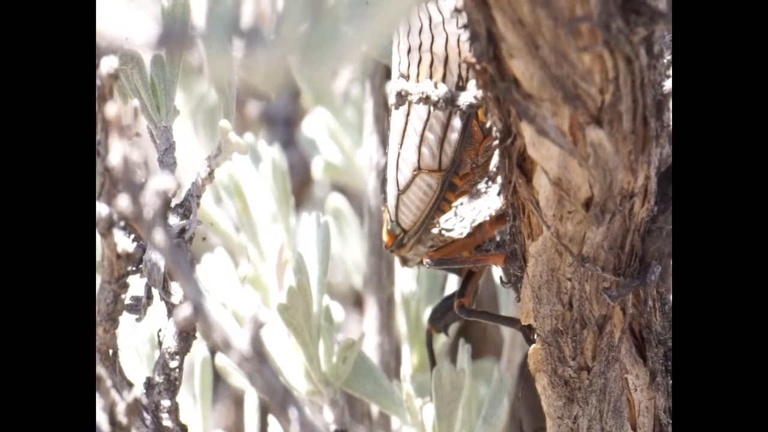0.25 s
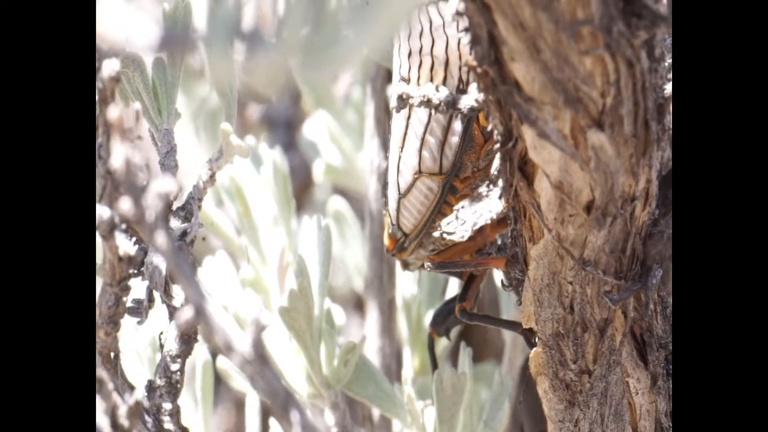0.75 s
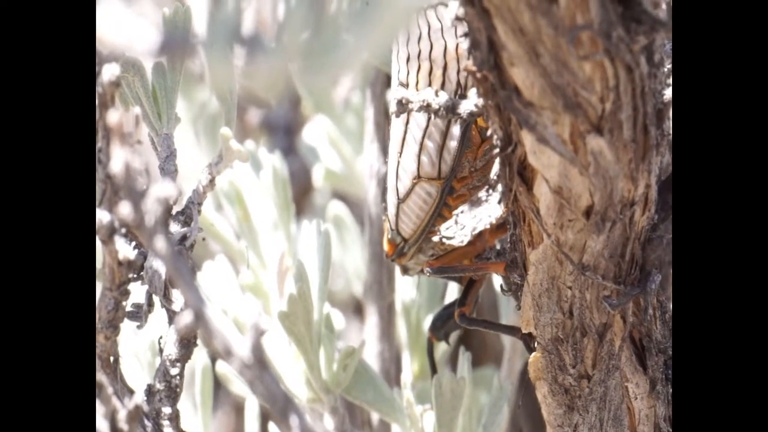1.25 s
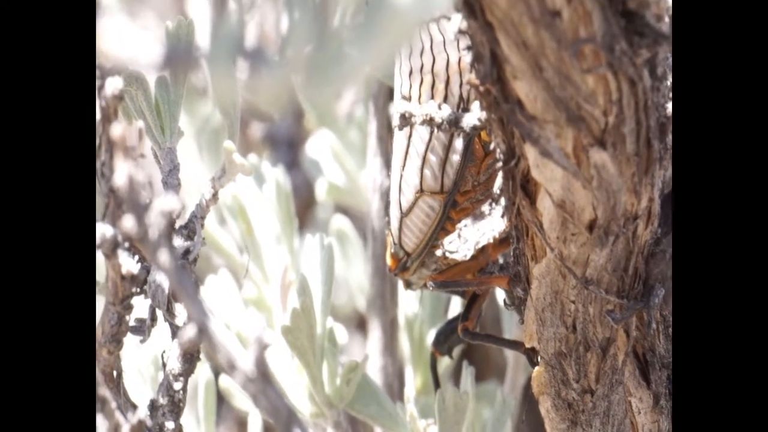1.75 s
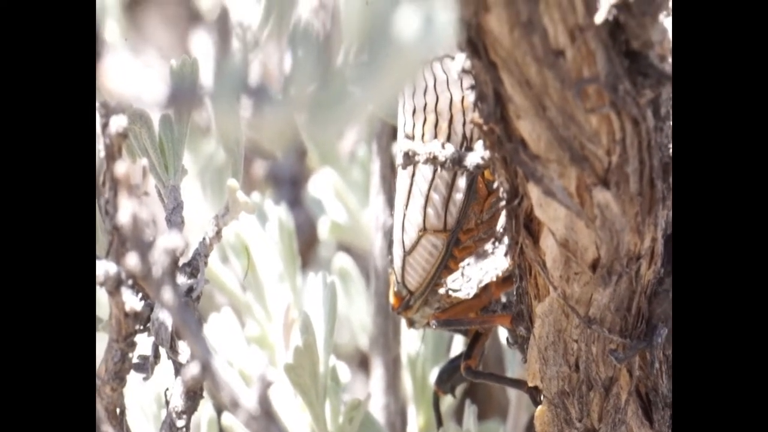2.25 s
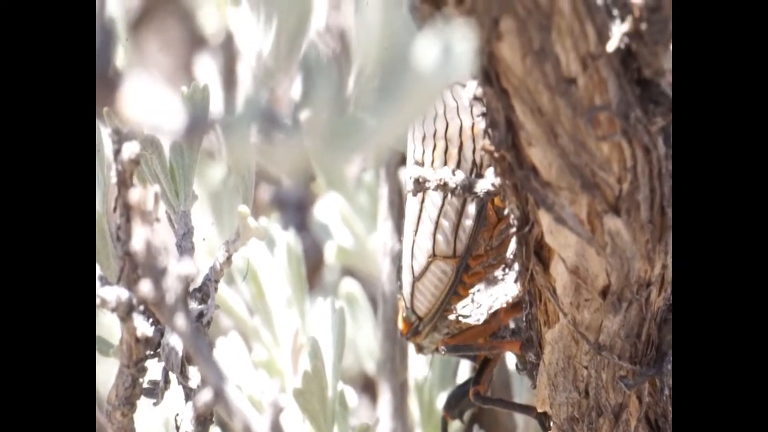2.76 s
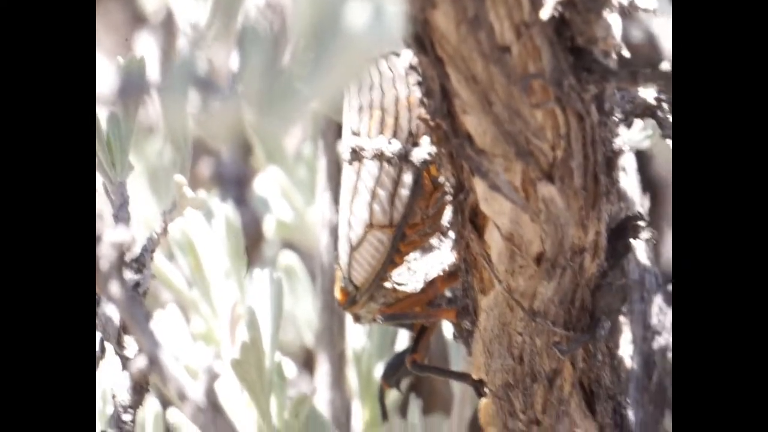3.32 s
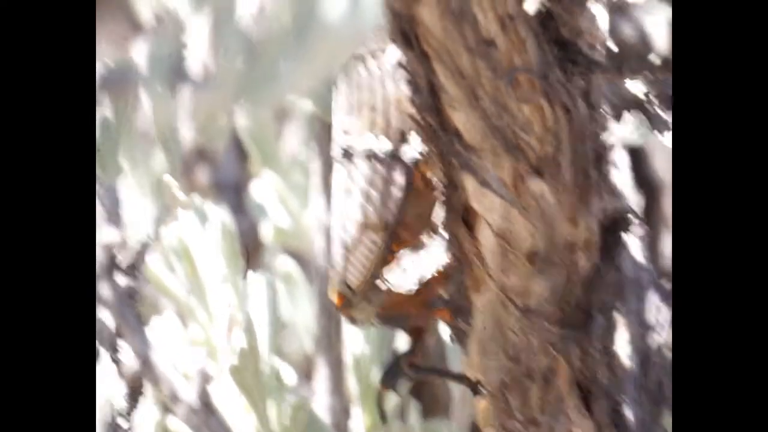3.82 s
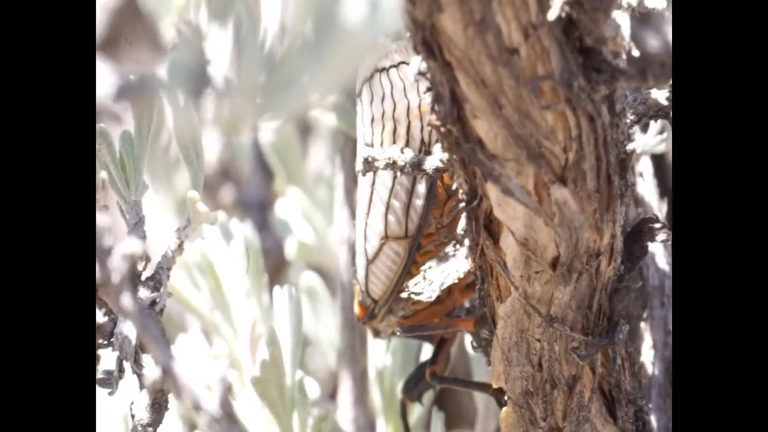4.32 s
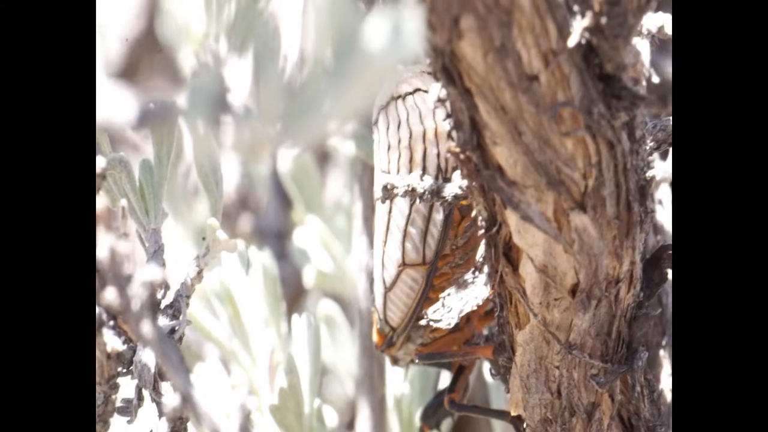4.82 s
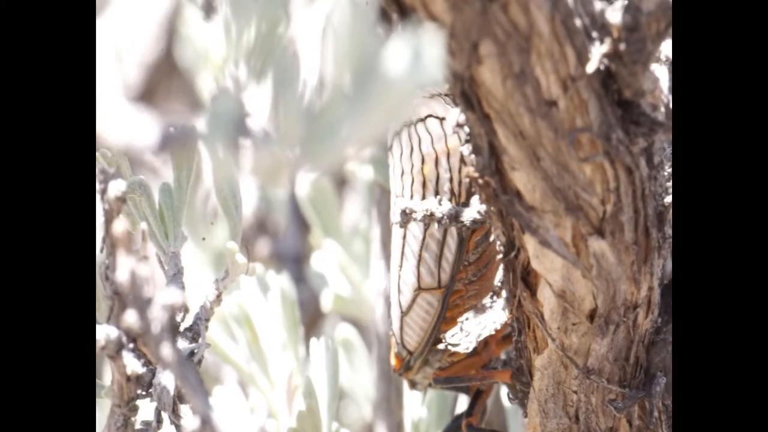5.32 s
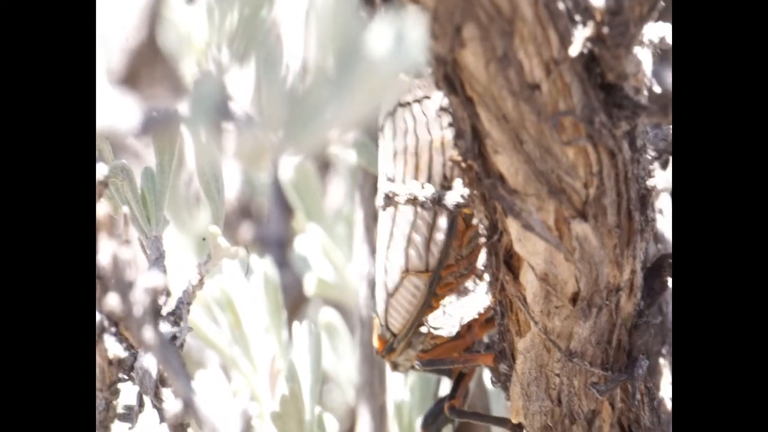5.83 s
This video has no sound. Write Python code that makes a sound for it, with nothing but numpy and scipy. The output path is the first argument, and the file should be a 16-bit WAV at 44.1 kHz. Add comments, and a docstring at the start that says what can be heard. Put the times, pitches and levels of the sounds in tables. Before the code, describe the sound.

A close cicada on a shrub trunk makes five accelerating dry ticks, then a high, rapidly pulsed buzz that builds, holds steady, grows louder near the end and stops abruptly. Low wind gusts thump a nearby stereo microphone, strongest in the middle. Distant cicadas throb faintly and the scrub hisses softly throughout.

```python
"""Far cicadas throb and scrub hisses faintly throughout, around a cicada on a shrub trunk close to a stereo microphone.
It gives a few single ticks, then a buzz that swells and stops; in between, gusts of wind buffet the microphone.
Each muscle stroke buckles the ribs of both tymbals one after another, then lets them snap back; the clicks ring the body.
Chorus, wind and scrub are coloured noise under slow or rhythmic envelopes; bark and leaves echo the near cicada."""
import sys
import numpy as np
from scipy import signal
from scipy.fft import rfft, irfft, next_fast_len
from scipy.io import wavfile
from scipy.ndimage import uniform_filter1d

SR = 44100
rng = np.random.default_rng(int(sys.argv[2]) if len(sys.argv) > 2 else 0)


def pcm_store(signal):
    """Save signal as 16-bit PCM."""
    levels = np.round(np.clip(np.atleast_2d(signal), -1, 1) * 32767)
    wavfile.write(sys.argv[1], SR, levels.astype(np.int16).T)


N = 267907
FAST = next_fast_len(N + 4096)  # transform length, with room for tails

# Pace of the tymbal muscle through the buzz. Each row: time in seconds, strokes per second.
STROKE_PACE = [(0.9416, 56.61), (1.07, 58.58), (1.33, 55.68), (1.55, 57.73), (1.95, 56.36), (2.2, 56.96),
               (3.45, 56.42), (3.7, 56.64), (4.2, 56.73), (4.75, 57.49), (5.25, 57.29), (5.56, 56.62),
               (5.62, 52.5)]
# Effort of the muscle. Each row: time in seconds, ribs buckled per stroke.
MUSCLE_EFFORT = [(1.07, 2.2), (1.08, 3.2), (1.7, 3.2), (1.71, 3.6), (2.02, 3.6), (2.05, 4.2), (4.5, 4.2),
                 (4.8, 4.5), (5.1, 5.5), (5.63, 5.8)]
# Background level while the buzz is loudest. Each row: time in seconds, level change in dB.
BACKGROUND_LEVEL = [(4.82, 0), (5.36, -12.5), (5.65, -12), (5.8, -6)]


def cicada():
    """Impulsive excitation of a resonator: ticks and buzz, with discrete bark echoes and decaying leaf scatter."""
    # Loudness of the buzz. Each row: time in seconds, level in dB, left minus right in dB.
    song = [(0.93, -41, 0), (1.06, -37.5, -2), (1.09, -32, 3), (1.15, -29, -1), (2.2, -25.5, -0.5),
            (4.7, -25.3, -1), (5.07, -20.5, -2), (5.6, -21, -3), (5.63, -24, -3)]
    level_db, pan_db = curve(song)
    buzz = steady(ring(*strokes())) * undb(level_db + np.array([pan_db, -pan_db]) / 2)
    near = tint(buzz + ticks(), rfft(surroundings(), FAST))
    return near + rasp(buzz, level_db)


def strokes():
    """Sequential buckling: times, levels, kinds, lift and pan of all clicks of the buzz."""
    # Ribs 2 to 6. Each row: level in dB, level when the abdomen is lifted in dB,
    # lead of the far tymbal in ms, far tymbal level in dB, timing scatter in ms.
    ribs_2_to_6 = [(-4, -2, .5, -1, .06), (0, 0, .6, -6, .15), (0, -1, .3, -8, .15), (-4, -2, .6, -3, .3),
                   (-6, -4, .5, -4, .35)]
    # Delays of ribs 4, 5 and 6 after the first, in ms.
    late_ribs_ms = (8.2, 10.2, 11.4)
    first_rib_db, weak_boost_db, snap_db = -9, 8, -9
    tymbal_pan_db = 2.5  # the two tymbals face different ways

    now = np.arange(N) / SR
    start_s, end_s = STROKE_PACE[0][0], STROKE_PACE[-1][0]
    done = np.cumsum(curve(STROKE_PACE)[0] * (now > start_s)) / SR
    k = np.arange(int(np.interp(end_s, now, done)) + 1)
    chance = rng.standard_normal((len(k), 3, 7))
    t0 = np.maximum(np.interp(k, done, now), start_s)
    t0 = t0 + .0002 * chance[:, 2, 0]  # 0.2 ms of jitter
    effort = curve(MUSCLE_EFFORT, t0)[0]
    lift = lifted(effort)
    second_ms = np.where(effort < 3, 2.55, 3.25)
    third_ms = 5.85 + .65 * lift
    snap_ms = 7.9 + 1.1 * effort  # more ribs, later snap-back
    # in a weak stroke the first rib stands closer to the second in level
    first_db = first_rib_db + weak_boost_db * (effort < 2.5) - 3 * lift
    # between two counts the last rib tends to buckle on every other stroke
    alternate = .5 * (1 - k % 2)
    ribs = np.floor(effort + alternate + .06 + .08 * chance[:, 2, 1])
    weak = ribs < 3

    # the first rib: a click and a fainter one 0.4 ms ahead
    clicks = [(t0, first_db, 1, lift, 0), (t0 - .0004, first_db - 7, 1, lift, 0)]
    for r, ms in enumerate((second_ms, third_ms) + late_ribs_ms):
        db, lifted_db, lead_ms, far_db, scatter_ms = ribs_2_to_6[r]
        on = ribs > r + 1
        # on the last early rib of a short stroke the far tymbal is fainter
        far_rib_db = far_db - 5 * (ribs == r + 2) * (r < 2)
        for side in (0, 1):  # near tymbal, far tymbal
            lead = side * lead_ms * (1 + lift)  # doubles once the abdomen is up
            t = t0 + (ms - lead + scatter_ms * chance[:, side, r]) / 1000
            size_db = db + lift * (lifted_db - db) + side * far_rib_db
            size_db = size_db + chance[:, 1 - side, r + 1]  # 1 dB of scatter
            kind = weak[on] * 1  # a weak stroke's second rib is as dull as the first
            clicks.append((t[on], size_db[on], kind, lift[on], tymbal_pan_db * (1 - 2 * side)))
    for side in (0, 1):
        t = t0 + (snap_ms - side * .5 + .2 * chance[:, side, 6]) / 1000
        size_db = snap_db - side * 3 + weak_boost_db / 2 * weak
        clicks.append((t, size_db, 2, lift, tymbal_pan_db * (1 - 2 * side)))
    return [np.concatenate([np.broadcast_to(c[i], c[0].shape) for c in clicks]) for i in range(5)]


def lifted(ribs):
    """Posture follows effort: how far the abdomen is raised, from 0 to 1."""
    # Effort, in ribs per stroke, at which the lift starts and ends.
    lift_ribs = (4.3, 5.5)
    return np.interp(ribs, lift_ribs, (0, 1))


def ring(s, db, kind, lift, pan_db):
    """Convolution with an impulse response: every click (0 rib, 1 first rib, 2 snap-back) rings the body."""
    # Ring of tymbals and air sac, abdomen down, then lifted. Each row: frequency in Hz, level in dB per Hz.
    body_down = [(1800, -62), (2400, -49), (3000, -35), (4000, -37), (4850, -36), (5150, -24), (5900, -19),
                 (6900, -23), (7250, -17), (7600, -5), (8000, -6), (8450, 0), (9100, -12), (10300, -8),
                 (11000, -14)]
    body_up = [(2500, -76), (4300, -54.5), (4900, -44), (5600, -26.5), (6500, -22), (7000, -20.5),
               (7450, -3), (8000, -11.5), (8500, -7), (9000, -6.5), (9600, -13), (10100, -15.5),
               (11000, -24)]
    # The first rib is duller, the snap-back brighter. Each row: frequency in Hz, gain in dB.
    first_rib = [(3000, -14), (5000, -10), (6500, -2), (7600, 2), (8600, -2), (9500, -14)]
    snap_back = [(4000, -18), (8600, -18), (9400, -4), (10200, 0)]
    # Level between the microphones. Each row: frequency in Hz, left minus right in dB.
    balance_db = [(3000, -6), (4800, -3.5), (5700, -1.5), (6300, -5.5), (7000, -5), (7700, 1), (8300, -1),
                  (9700, 0), (10100, -4)]
    # Phase between the microphones. Each row: frequency in Hz, lead of the left in radians.
    left_lead = [(4300, -0.33), (5500, -1.1), (6000, -0.88), (7000, -1.2), (7400, 1), (9000, -1.05),
                 (9300, 1), (9900, -0.7), (11000, -0.91)]

    # windowed sinc pulses place the clicks between samples
    taps = np.floor(s * SR).astype(int)[:, None] + np.arange(-7, 9)
    off = taps - s[:, None] * SR
    click = undb(db)[:, None] * np.sinc(off) * np.cos(np.pi * off / 16) ** 2
    out = 0
    for k, shade in enumerate(([(1, 0)], first_rib, snap_back)):
        for body, share in ((body_down, (1 - lift) ** 2), (body_up, lift * (2 - lift))):
            size = [share * (kind == k) * undb(side * pan_db) for side in (.5, -.5)]
            train = [np.bincount(taps.ravel(), (click * g[:, None]).ravel(), N) for g in size]
            response = causal(read(body, size=1024) + read(shade, size=1024))
            out = out + rfft(train, FAST) * rfft(response, FAST)
    side = np.array([[.5], [-.5]])
    gain = undb(side * read(balance_db, FAST))
    phase = np.exp(1j * side * read(left_lead, FAST))
    return irfft(out * gain * phase, FAST)[:, :N]


def steady(x):
    """Normalization by running power: even loudness, averaged twice over about four strokes."""
    k = int(4 * SR / 56.8)
    power = uniform_filter1d(uniform_filter1d(np.mean(x ** 2, 0), k), k)
    return x / np.sqrt(power + 1e-9)


def ticks():
    """Single-rib buckling: each warm-up stroke gives one click and a softer snap-back."""
    # Warm-up strokes. Each row: time in seconds, click level in dB before the body's ring.
    tick_strokes = [(0.7642, 4), (0.82, 5.5), (0.854, 0.5), (0.908, 4.5), (0.926, 4)]
    snap_s, snap_db = .008, -7  # delay after the stroke, level relative to the click
    s, db = np.transpose(tick_strokes)
    times = np.r_[s + .0006, s + snap_s]
    levels_db = np.r_[db, db + snap_db]
    kinds = np.repeat([1, 2], len(s))
    lift, pan_db = np.zeros((2, 2 * len(s)))
    return ring(times, levels_db, kinds, lift, pan_db)


def rasp(buzz, level_db):
    """Amplitude modulation of noise: a low rasp swells with every stroke and fades as the buzz grows loudest."""
    # Rasp spectrum. Each row: frequency in Hz, level in dB per Hz.
    rasp_colour = [(1800, -39), (2500, -12), (3000, -3), (4600, -5.5), (5600, 1), (6900, -1.5), (7600, -35)]
    rasp_db = -24.5  # relative to the swell
    singing = np.arange(N) > STROKE_PACE[0][0] * SR
    stroke_power = uniform_filter1d(np.mean(buzz ** 2, 0), size=120)
    floor_power = .3 * undb(2 * level_db) * singing  # runs on between strokes
    swell = np.sqrt(stroke_power + floor_power)
    fade = (1 - lifted(curve(MUSCLE_EFFORT)[0])) ** 2
    return noise(rasp_colour, [(3000, 0.58)]) * swell * undb(rasp_db) * fade


def surroundings():
    """Impulse response of the surroundings: direct sound, bark echoes and exponentially decaying leaf scatter."""
    # Echoes from the bark. Each row: delay in ms, left level in dB, right level in dB.
    bark_echo = [(1.19, -11, -10), (3.1, -22, -22)]
    leaves_db, leaves_t60_s = -34, .04
    t = np.arange(int(.08 * SR)) / SR
    decay = undb(leaves_db - 60 * t / leaves_t60_s) * (t > .001)
    space = unit(rng.standard_normal((2, len(t)))) * decay
    space[:, 0] = 1
    for ms, left_db, right_db in bark_echo:
        space[:, int(ms * SR / 1000)] += undb([left_db, right_db])
    return space


def chorus():
    """Amplitude modulation: far cicadas blur into a hiss that throbs at a stroke rate, with a random rough grain."""
    # Loudness of the chorus. Each row: time in seconds, level in dB.
    chorus_level = [(.3, -45), (.75, -49), (5.0, -44), (5.68, -50), (6.07, -48)]
    # Chorus spectrum. Each row: frequency in Hz, level in dB per Hz.
    chorus_colour = [(3240, -51), (5500, -31), (6450, -21), (8550, -1), (9770, -2), (11000, -12.5),
                     (11400, -63), (11500, -50), (12000, -56), (15600, -88), (22000, -120)]
    phase = np.cumsum(56.3 + walk(3.54)) / SR  # strokes, at a wandering rate per second
    depth = 0.65 * (1 + 0.15 * walk(24))
    throb = np.exp(depth * np.cos(2 * np.pi * phase) / 2)
    grain = undb(0.5 * walk(790) + walk(8.4))
    hiss = noise(chorus_colour, [(6000, -.1), (12000, -0.011)]) * throb * grain
    return unit(hiss) * undb(curve(chorus_level)[0])


def wind():
    """Turbulent pressure on the microphone: gusts of low rumble and a lumpier upper buffet."""
    # Each row: start of the hold in seconds, hold in seconds, rumble in dB, upper buffet in dB before its lumps.
    gust_table = [(1.25, .03, -46, -56), (1.34, .14, -39.5, -50), (2.92, 0.0074, -46, -78),
                  (3.06, .05, -37, -39), (3.17, .1, -33, -30), (3.37, .05, -32, -38), (3.52, .09, -31, -32),
                  (3.639, 0.0081, -25, -36), (3.73, .05, -38, -50), (3.85, .03, -47, -56),
                  (4.65, .15, -45, -54), (4.9, .05, -51, -62), (5.12, 0.018, -48, -67),
                  (5.78, 0.011, -54, -64), (5.96, 0.044, -45, -59.5)]
    rise_db_s, fall_db_s = 260, 200  # dB per second
    calm_rumble_db, calm_buffet_db = -65.5, -63.5  # before the background level change
    s, held, low_db, upper_db = np.transpose(gust_table)
    background_db = curve(BACKGROUND_LEVEL)[0]

    def gusts(db, calm_db):
        """Gust envelopes add to the amplitude of the background."""
        return swells(s, held, db, rise_db_s, fall_db_s) + undb(calm_db + background_db)

    alike = [(30, .75), (130, .5), (400, 0)]  # Hz, left-right correlation
    low = noise([(12, -25), (25, 0), (75, 0), (110, -11), (200, -55.5)], alike)
    upper = noise([(60, -37), (90, 4), (160, -4), (300, -19.5), (600, -42.0), (1200, -77)], alike)
    lumps = undb(2.5 * walk(25))
    return low * gusts(low_db, calm_rumble_db) + upper * gusts(upper_db, calm_buffet_db) * lumps


def scrub():
    """Broadband friction noise: a soft bed of hiss, thin in the treble, with two leaf brushes."""
    # Scrub spectrum; its last two rows are replaced below. Each row: frequency in Hz, level in dB per Hz.
    scrub_colour = [(35, -33), (60, -17), (97, 2.5), (118, -5.5), (142, -4), (490, -10), (802, -12),
                    (1340, -17), (2400, -20.5), (3120, -76), (5280, -120)]
    # Likeness of the two channels. Each row: frequency in Hz, left-right correlation.
    likeness = [(60, 0.98), (130, 1), (270, 0.29), (580, -0.29), (1200, -0.37), (5000, -0.15)]
    # A leaf brushes. Each row: start of the hold in seconds, hold in seconds, level in dB before its grain.
    rustles = [(4.12, 0.019, -47), (4.28, .03, -53.5)]
    scrub_db = -57  # before its level changes
    bed = noise(scrub_colour[:-2] + [(3500, -21.5), (6000, -24.5), (12000, -33.0)], likeness)
    leaf = noise([(300, -4), (1200, -7), (2500, -6), (3500, 0), (6000, -27)], likeness)
    brush = swells(*np.transpose(rustles), rise_db=600, fall_db=300)
    bed_level = undb(scrub_db + curve(BACKGROUND_LEVEL)[0] + 1.5 * walk(8.04))
    grain = undb(2.0 * walk(140))
    return bed * bed_level + leaf * brush * grain


def undb(db):
    """Logarithmic level: amplitude ratio from decibels."""
    return 10 ** (np.asarray(db) / 20)


def curve(table, s=None):
    """Linear interpolation: columns of a table read at times s, or at every sample."""
    t, *columns = np.transpose(table)
    at = np.arange(N) / SR if s is None else s
    return [np.interp(at, t, c) for c in columns]


def unit(x):
    """Normalization to an rms of one."""
    return x / np.sqrt(np.mean(x ** 2))


def walk(rate):
    """Low-pass random modulation: levels held 1 / rate s and slewed twice; spread near 1."""
    k = int(SR / rate)
    steps = np.repeat(rng.standard_normal(N // k + 1), k)
    return 1.66 * uniform_filter1d(uniform_filter1d(steps, k), k)[:N]


def noise(colour, likeness):
    """Mid-side synthesis: two channels of coloured noise with a set correlation."""
    c = np.clip(read(likeness, FAST), -1, 1)
    response = undb(read(colour, FAST)) * np.sqrt([1 + c, 1 - c])
    mid, side = tint(rng.standard_normal((2, N)), response)
    return unit(np.array([mid + side, mid - side]))


def read(table, size):
    """Interpolation on log frequency: a table of Hz and value on the bins of a transform."""
    hz, value = np.transpose(table)
    bins_hz = np.arange(1, size // 2 + 2) * SR / size
    return np.interp(np.log(bins_hz), np.log(hz), value)


def causal(db):
    """Minimum phase by the folded cepstrum: the shortest ring that starts at once with this spectrum."""
    c = irfft(db * np.log(10) / 20)
    c[1:len(c) // 2] *= 2
    c[len(c) // 2 + 1:] = 0
    return irfft(np.exp(rfft(c)))[:len(c) // 2]


def tint(x, response):
    """Linear filtering as a product of spectra on the bins of the long transform."""
    return irfft(rfft(x, FAST) * response, FAST)[..., :N]


def swells(s, held, db, rise_db, fall_db):
    """Exponential growth and decay: a sum of swells that rise, hold and fall at set dB per second."""
    t = np.arange(N) / SR
    total = 0
    for start, hold, peak_db in zip(s, held, db):
        before = np.clip(start - t, 0, 1)
        after = np.clip(t - start - hold, 0, 1)
        total = total + undb(peak_db - rise_db * before - fall_db * after)
    return total


def scene():
    """Linear superposition of all sources."""
    return cicada() + chorus() + wind() + scrub()


def record(dry):
    """Low-pass response: the sound ends steeply above 11 kHz."""
    # Top edge of the band. Each row: frequency in Hz, gain in dB.
    top_edge = [(11000, 0), (11080, -12), (12400, -45)]
    soft = tint(dry, undb(read(top_edge, FAST)))
    # 0.2 dB ripple, 50 dB rejection, edge in Hz
    steep = signal.ellip(10, .2, 50, 12370, fs=SR, output="sos")
    return signal.sosfilt(steep, soft)


dry = scene()
out = record(dry)
pcm_store(out)
```